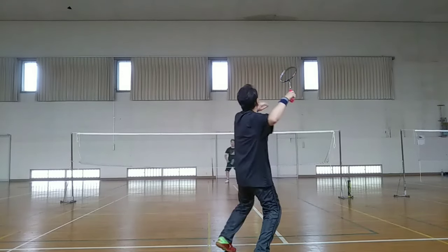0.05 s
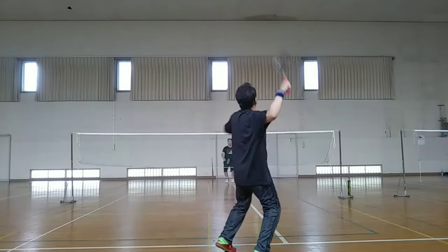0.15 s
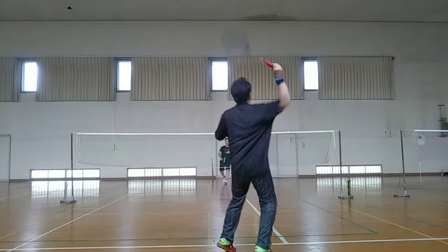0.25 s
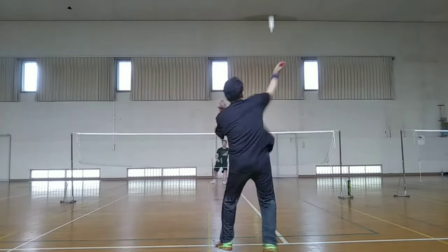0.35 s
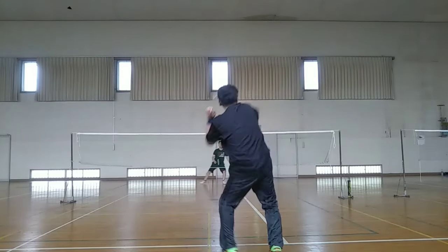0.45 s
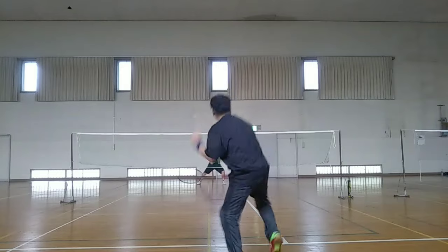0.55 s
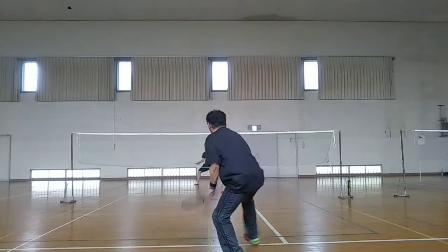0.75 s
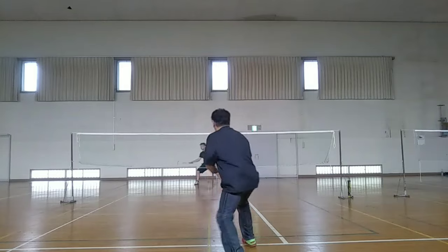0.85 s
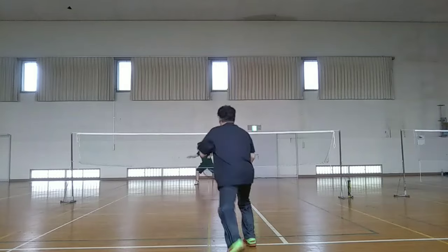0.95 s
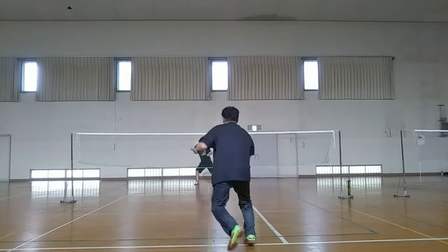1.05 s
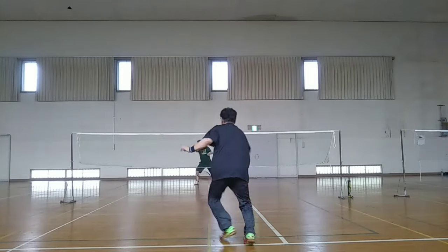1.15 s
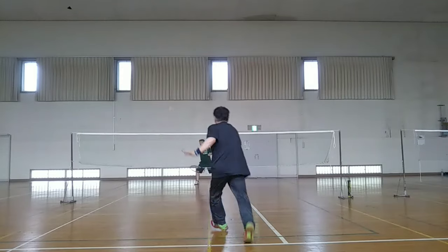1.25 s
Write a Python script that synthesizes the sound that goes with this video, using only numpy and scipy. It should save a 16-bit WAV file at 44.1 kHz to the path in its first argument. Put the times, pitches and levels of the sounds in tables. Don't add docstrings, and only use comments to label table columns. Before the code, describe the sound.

One bright racket crack on a shuttlecock bursts out after light footfalls, followed by quick wall echoes and a long hall tail, low floor booms, a late shoe slap and small squeaks, heard from a few metres behind.

```python
import sys
import numpy as np
from scipy import signal
from scipy.fft import rfft, irfft
from scipy.io import wavfile
from scipy.ndimage import uniform_filter1d

SR = 44100
rng = np.random.default_rng(int(sys.argv[2]) if len(sys.argv) > 2 else 0)


def ratio(d):
    e = np.asarray(d, float) / 20
    return 10 ** e


def store_pcm(level_fs):
    pcm = np.round(np.clip(level_fs, -1, 1) * 32767).astype(np.int16)
    wavfile.write(sys.argv[1], SR, np.atleast_2d(pcm).T)


N = 57330
T = np.arange(N) / SR


def set_rms(x, db):
    return x * ratio(db) / np.sqrt(np.mean(x ** 2))


def read(table, hz):
    table_hz, value = np.array(table).T
    return np.interp(np.log(hz), np.log(table_hz), value)


def band(x, hz, width_hz):
    return signal.lfilter(*signal.iirpeak(hz, hz / width_hz, SR), x)


def coloured(table):
    hz = np.arange(1, N // 2 + 2) * SR / N
    spectrum = rfft(rng.standard_normal(N)) * ratio(read(table, hz)) * (hz > 25)
    return set_rms(irfft(spectrum, N), 0)


def walk(rate_hz):
    k = int(SR / rate_hz)
    once = uniform_filter1d(rng.standard_normal(N), k)
    return set_rms(uniform_filter1d(once, k), 0)


def ring(start, hz, t60, push):
    t = np.maximum(T - start, 0)
    swell = np.sin(np.pi / 2 * np.minimum(t / push, 1)) ** 2
    decay = ratio(-60 * np.maximum(t - push, 0) / t60)
    return np.sin(2 * np.pi * hz * t) * swell * decay


def delayed(x, s):
    k = int(round(s * SR))
    return np.concatenate([np.zeros(k), x[:N - k]])


def hall_air():
    # f/Hz, level/dB
    air_tone = [(30, -8.5), (50, -1.5), (120, -1), (260, -16), (1200, -24), (3000, -30), (6000, -33.5),
                (8000, -37.5)]
    air_db, wander_db = -52, 1.0
    return ratio(air_db + wander_db * walk(2.7)) * coloured(air_tone)


def footfalls():
    # t/s, level/dB, boom f/Hz, push/s, t60/s
    steps = [(.0, -49.5, 47.5, 0.075, 0.38), (0.067, -39, 120, 0.0055, 0.28),
             (0.114, -28, 73.5, 0.025, 0.093), (.165, -29, 54.6, 0.036, 0.35),
             (0.237, -33, 54, 0.03, 0.034), (0.306, -38, 52, 0.02, 0.7), (.41, -28, 90, 0.034, 0.18),
             (0.433, -24.5, 50, 0.044, 0.51), (.545, -24.5, 50, 0.038, .15), (.60, -32.5, 93, 0.015, 0.25),
             (0.641, -20.5, 86, .022, .12), (.675, -22.5, 54, 0.026, 0.1), (0.699, -29.5, 112, 0.013, 0.11),
             (.755, -30.5, 60, 0.013, 0.34), (.82, -41, 93.8, 0.018, 0.43), (0.899, -33.5, 88, 0.015, 0.22),
             (0.951, -34.5, 87, 0.022, 0.23), (0.987, -33, 52, 0.029, 0.58), (1.10, -36, 103, 0.012, 0.14),
             (1.165, -36.5, 50, 0.015, 0.57)]
    return sum(ratio(db) * ring(s, hz, t60, push) for s, db, hz, push, t60 in steps)


def rattles():
    # t/s, level/dB, rise/s, t60/s
    rattling = [
        (0.061, -48, 0.012, 0.64),
        (0.398, -42, 0.06, 1),
        (.50, -41, 0.03, 0.99),
        (0.619, -45.5, 0.014, 0.43),
        (1.016, -46.5, 0.034, 0.78),
        (1.108, -47.5, 0.01, 0.54),
    ]
    hz, width_hz = 220, 304
    shape = 0
    for s, db, rise, t60 in rattling:
        decay = ratio(db - 60 * np.maximum(T - s - rise, 0) / t60)
        shape = shape + decay * np.clip((T - s) / rise, 0, 1)
    wood = band(band(rng.standard_normal(N), hz, width_hz), hz, width_hz)
    return shape * set_rms(wood, 0) * ratio(1.8 * walk(46))


def slaps():
    # t/s, level/dB, f/Hz, t60/s
    sole_hits = [(0.0683, -41, 2170, 0.0065), (0.07, -44, 323, 0.041), (0.086, -42, 1000, 0.012),
                 (0.1052, -47, 1287, 0.013), (.110, -40, 1000, 0.011), (.1050, -50.5, 3580, 0.013),
                 (.124, -53.5, 3460, 0.014), (.140, -55, 1940, .03), (0.206, -59, 6520, 0.039),
                 (0.429, -32.5, 220, 0.083), (.460, -27.5, 218, 0.054), (.486, -29, 342, 0.079),
                 (0.536, -34.5, 233, 0.07), (0.654, -32, 172.3, 0.13), (.89, -41.5, 305, 0.052),
                 (1.035, -46, 7800, .02), (1.0631, -23, 243, 0.027), (1.0650, -38, 810, .03),
                 (1.0870, -30, 223, 0.0335), (1.089, -36, 448, 0.042)]
    grit_db = -12
    out = 0
    for s, db, hz, t60 in sole_hits:
        burst = rng.standard_normal(N) * (T > s) * ratio(-60 * np.abs(T - s) / t60)
        grit = band(band(burst, hz, hz), hz, hz) * np.sqrt(SR / hz / 4)
        out = out + ratio(db) * (ring(s, hz, t60, 0.0017) + ratio(grit_db) * grit)
    return out


def hall():
    # f/Hz, t60/s
    hall_t60 = [(100, 2.2), (350, 0.86), (700, 2.08), (1400, 2.32), (2700, 2.23), (4000, 2.62),
                (5500, 2.03), (8000, 1.4)]
    # f/Hz, spectral density/dB
    hall_tone = [(120, -4.5), (400, -3.5), (1200, -5), (3300, -4), (4050, -12), (4600, -9.5), (6300, -6),
                 (8000, -12.5)]
    build_s, early_db, early_s = 0.096, 4.5, 0.029
    hz, t, z = signal.stft(coloured(hall_tone), SR, nperseg=512)
    decay = ratio(-60 * t / read(hall_t60, hz + 1)[:, None])
    tail = signal.istft(z * decay, SR, nperseg=512)[1][:N]
    build = np.minimum(T / build_s, 1) ** 2.73
    early = ratio(early_db) * np.exp(-T / early_s) * np.minimum(T / 0.0048, 1)
    return tail * (build + early)


def scuffs():
    # t/s, length/s, level/dB
    slides = [
        (0.074, 0.089, -54.5),
        (0.116, 0.25, -57),
        (0.339, 0.097, -58),
        (0.409, 0.11, -47.5),
        (1.064, 0.089, -50),
        (1.215, 0.048, -57),
    ]
    hz, width_hz = 1000, 1800
    shape = sum(ratio(db) * np.sin(np.pi * np.clip((T - s) / length, 0, 1)) for s, length, db in slides)
    grains = band(band(rng.standard_normal(N), hz, width_hz), hz, 2 * width_hz)
    return shape * set_rms(grains, 0) * ratio(2 * walk(150))


def racket():
    # f/Hz, level/dB, t60/s
    modes = [(596, -5.5, 0.022), (953, -5.5, 0.023), (1206, -1, 0.016), (1860, -7.5, .016), (2510, -1, .02),
             (3070, -9, 0.02), (3626, -5.5, 0.019), (4290, -3, .025), (5770, -3, 0.027), (6180, -10, 0.019),
             (6860, -10, 0.014), (7460, -5, .012)]
    hit_db, crack_db, crack_t60_s, contact_s = -6.5, -3, 0.023, .0007
    lag = rng.random(len(modes)) * contact_s
    rung = sum(ratio(db) * ring(s, hz, t60, 0.00026) for s, (hz, db, t60) in zip(lag, modes))
    crack = band(rng.standard_normal(N) * ratio(-60 * T / crack_t60_s), 3360, 5900)
    return ratio(hit_db) * (rung / 2 + ratio(crack_db) * crack)


def echoes(hit):
    # t/s, peak level/dB, favoured f/Hz, width/Hz
    reflections = [(.4634, -3.5, 2630, 5100), (.4650, -16, 5600, 1700), (.4836, -14.5, 3100, 1460),
                   (0.48, -22.5, 4500, 480), (.4835, -21, 705, 88), (.4830, -25.5, 1030, 98),
                   (.4825, -23, 1580, 117), (0.51, -20, 2210, 3000), (0.48, -33, 5240, 800),
                   (.5213, -13.5, 6250, 490), (0.5204, -17.5, 6700, 9000), (.5283, -23.5, 3000, 1200),
                   (0.5364, -16.5, 3000, 7000), (.5360, -21.5, 763, 248), (.5485, -22.5, 3600, 770),
                   (.5618, -19.5, 2840, 1300), (.5622, -22, 6900, 900), (0.51, -21.5, 2200, 2500),
                   (.5725, -19.5, 1750, 600), (.5830, -19, 2800, 3500), (.6520, -19.5, 2800, 2500),
                   (0.79, -26.5, 1530, 470)]
    crack = hit * ratio(-60 * T / .016)
    out = 0
    for s, db, hz, width_hz in reflections:
        tinted = band(band(crack, hz, width_hz), hz, width_hz)
        out = out + ratio(db) * delayed(tinted / np.abs(tinted).max(), s)
    return out


def squeaks():
    # t/s, length/s, f/Hz, level/dB
    chirps = [
        (.92, .04, 1195, -51),
        (.97, .03, 1180, -53),
        (1.083, .055, 1112, -46),
        (1.135, .03, 1100, -48),
        (1.163, .035, 1115, -46),
        (1.2, .07, 1102, -52),
    ]
    sag, wobble = .01, .007
    fade_db, patchy_db, octave_db = 3, 2.5, -3
    octave = ratio(octave_db - 25 * np.clip(T - 1.09, 0, 1))
    out = 0
    for s, length, hz, db in chirps:
        u = np.clip((T - s) / length, 0, 1)
        pitch = hz * (1 - sag * u + wobble * walk(60))
        phase = 2 * np.pi * np.cumsum(pitch) / SR
        edges = np.minimum(u / 0.099, 1) * np.minimum((1 - u) / 0.18, 1)
        shape = edges * ratio(db - fade_db * u + patchy_db * walk(76))
        out = out + shape * (np.sin(phase) + octave * np.sin(2 * phase))
    return out


def scene():
    hit_s, tail_db, slap_wet_db = .4601, -25, -16.5
    hit, room, soles = racket(), hall(), slaps()
    wet_soles = signal.fftconvolve(soles, room)[:N] * ratio(slap_wet_db) / np.sqrt(np.sum(room ** 2))
    feet = footfalls() + rattles() + soles + wet_soles + scuffs() + squeaks()
    strike = delayed(hit, hit_s) + echoes(hit) + ratio(tail_db) * delayed(room, hit_s)
    return (hall_air() + feet + strike)[None]


def top_cut(x):
    return signal.sosfilt(signal.butter(12, 8740, fs=SR, output="sos"), x)


def record(dry):
    limit, roll_hz, shelf_db, top_hz = .9, 6840, -8.5, 8250
    hz = np.arange(N // 2 + 1) * SR / N
    shelf = ratio(shelf_db / (1 + (roll_hz / (hz + 1)) ** 40))
    rounded = limit * np.tanh(dry / limit)
    x = irfft(rfft(rounded) * shelf, N)
    x = signal.sosfilt(signal.cheby2(14, 62, top_hz + 500, fs=SR, output="sos"), x)
    return top_cut(x)


dry = scene()
out = record(dry)
store_pcm(out)
```